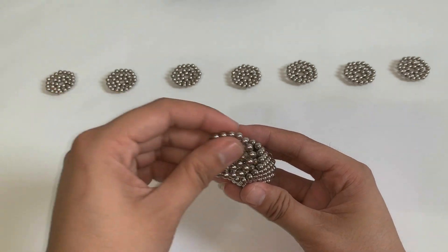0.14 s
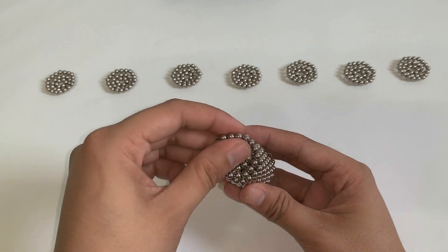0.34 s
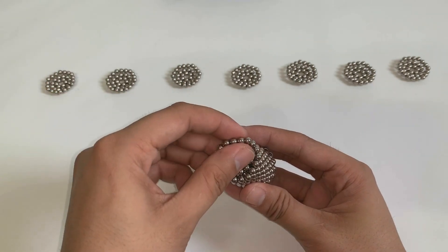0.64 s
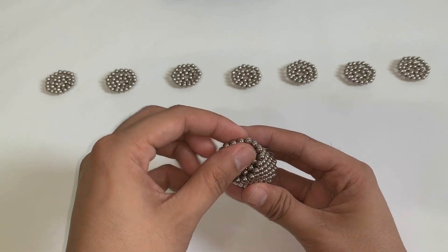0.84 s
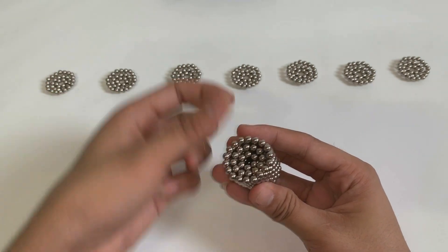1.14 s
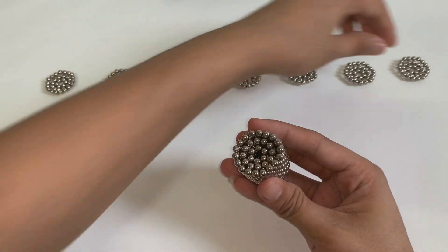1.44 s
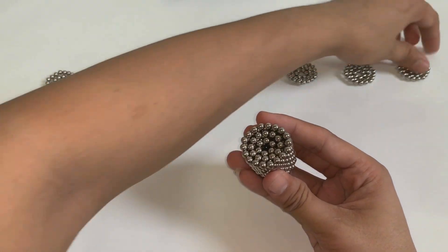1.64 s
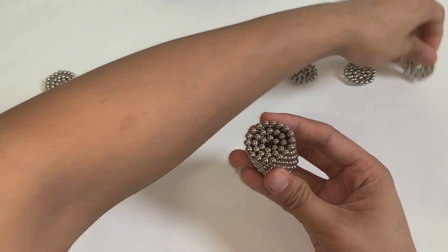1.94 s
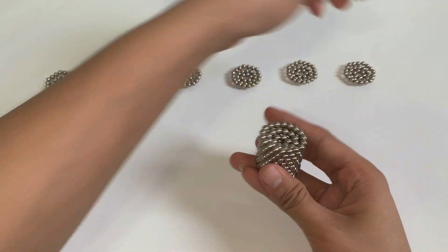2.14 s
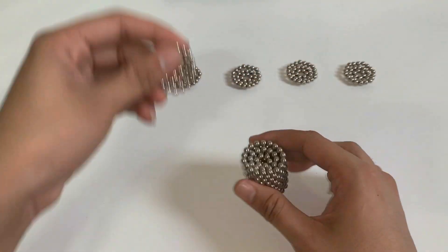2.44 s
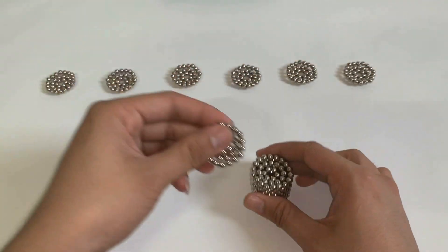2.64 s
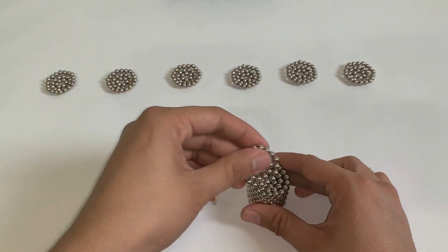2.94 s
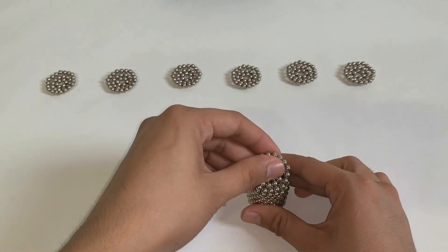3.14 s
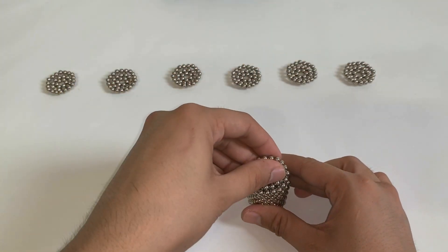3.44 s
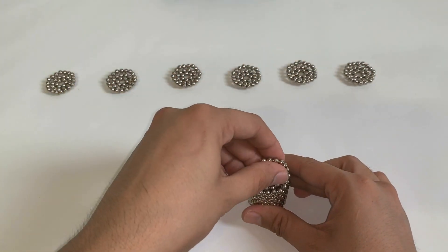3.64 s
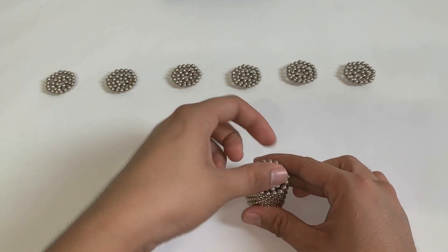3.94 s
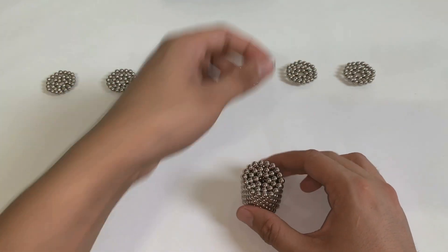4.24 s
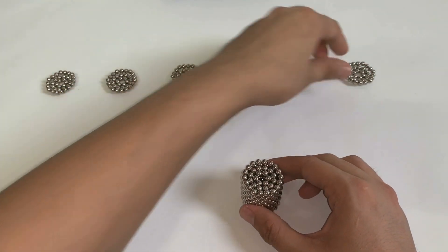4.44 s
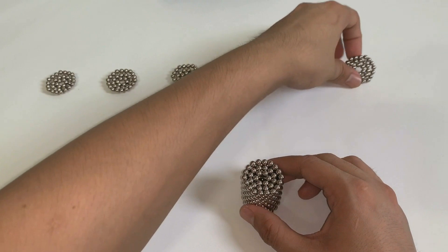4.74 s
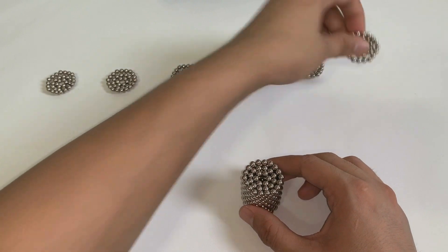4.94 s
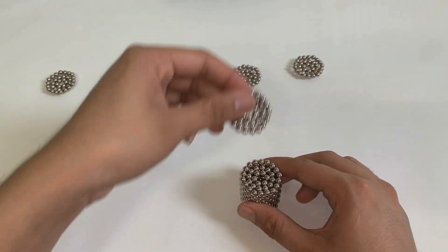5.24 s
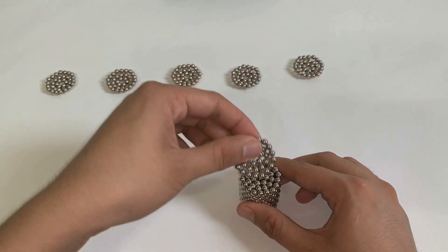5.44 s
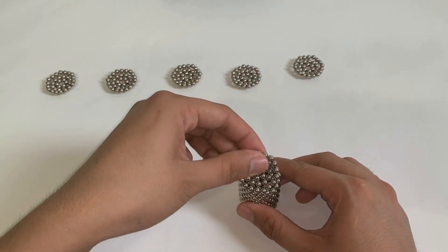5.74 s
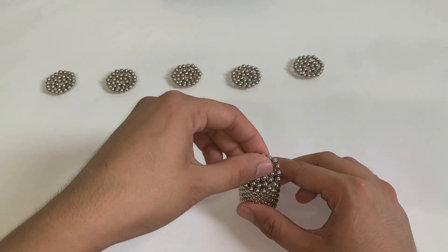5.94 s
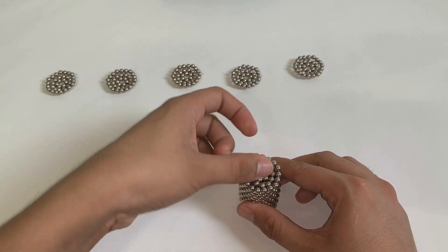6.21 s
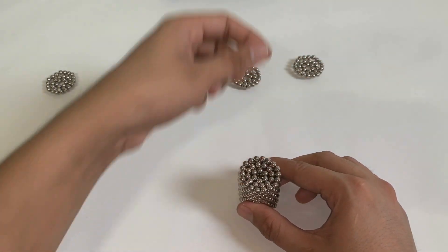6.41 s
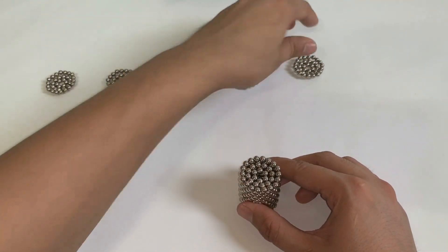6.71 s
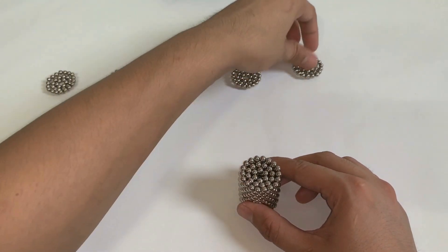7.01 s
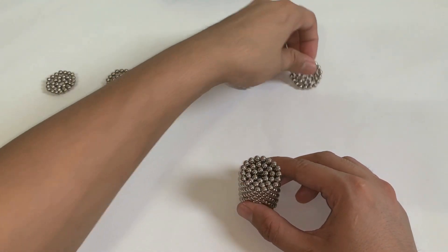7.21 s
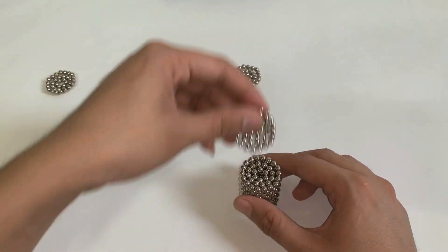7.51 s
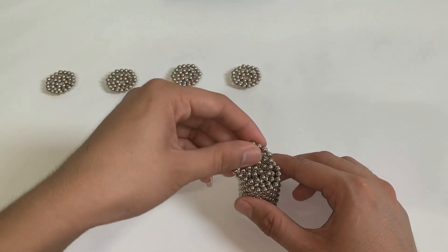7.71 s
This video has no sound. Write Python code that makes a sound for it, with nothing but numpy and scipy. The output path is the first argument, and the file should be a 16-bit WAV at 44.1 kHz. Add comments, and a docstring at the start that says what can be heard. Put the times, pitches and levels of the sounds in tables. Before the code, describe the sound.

Small magnetic metal balls click and snap together in short bursts, between soft bumps and brief scrapes on a table.

```python
"""Small magnetic steel balls click into place on a hand-held stack. A forearm bumps the table, a disc
of balls is dragged off it in stick-slip jerks, and the stack is set down with a knock. A faint,
breathy hiss follows, then the disc is pressed home in chains of snaps that drive the table's modes.
A second disc is dragged and snapped on, then a third is dragged, and a few last clicks follow.
Throughout, a small quiet room answers over a low rumble."""
import sys
import numpy as np
from scipy import signal
from scipy.fft import rfft, irfft, next_fast_len
from scipy.io import wavfile

SR = 44100
rng = np.random.default_rng(int(sys.argv[2]) if len(sys.argv) > 2 else 0)


def put_to_file(sound):
    """Save the sound as 16-bit audio at rate SR, in the file named by the first command-line argument."""
    columns = np.atleast_2d(sound).T  # one column per channel
    safe = np.clip(columns, -1, 1)
    whole_steps = np.round(safe * 32767)
    wavfile.write(sys.argv[1], SR, whole_steps.astype(np.int16))


N = 347067

# Balls jumping to their seats. Each row: start in seconds, relative level in dB, treble tilt.
SEATINGS = [(0.4777, -38, -7), (0.4808, -28.5, -6), (0.4832, -37, 0), (0.622, -46.5, -3), (0.6766, -36, 14),
            (0.69, -43.5, -6), (0.8637, -38, 24), (0.8748, -34.5, -4), (0.9086, -35.5, -8),
            (0.921, -54, -7), (0.9651, -45, -4), (0.9682, -42.5, -10), (0.987, -50, 1),
            (0.9891, -31.5, -11), (1.0018, -32, 4), (1.0045, -28, -15), (1.0072, -34, 2), (1.1054, -45, 19),
            (1.1089, -26, 8), (1.1155, -18, 21), (2.0497, -51.5, -20), (2.7518, -47, 7.5),
            (3.3974, -38.5, 6.5), (3.4009, -26, 11), (3.4127, -55, 8), (3.4649, -40, -3), (3.529, -45, 3),
            (3.5895, -43, 5), (3.6625, -47, 3), (3.72, -66, 0), (3.7519, -50.5, 3.5), (3.7581, -35.5, 0),
            (3.918, -41, -1), (3.9255, -39, -2.5), (3.9321, -42.5, 6), (3.9418, -47, 13),
            (3.965, -37.5, 18), (3.975, -39, 14), (3.9765, -45, 6), (3.9841, -25, 13), (3.9885, -19, 2),
            (3.9899, -21, 5), (3.9921, -17.5, -3), (4.191, -60, -14), (5.8101, -33, 6.5), (5.8121, -29, 15),
            (5.9177, -41, 4), (5.921, -51, 1), (6.0465, -43.5, 1), (6.0532, -36, 14), (6.1616, -38.5, -3),
            (6.1775, -38, 4), (6.1853, -34.5, -1), (6.19, -36.5, 18), (6.1935, -26, 4), (6.1957, -34, 10),
            (6.2382, -41, 1), (6.2596, -36, 16), (6.2615, -37.5, 2), (6.3186, -35, 6), (6.3242, -37, 4),
            (6.329, -27, 0), (6.3316, -26, 6), (6.3331, -31.5, 16), (6.342, -27.5, 15), (7.37, -62, -5),
            (7.7853, -37.5, 6.5), (7.7888, -34, -6)]
# Modes of the table top. Each row: frequency in Hz, relative level in dB, 60 dB decay time in seconds.
TABLE_MODES = [(103.6, -0.5, 0.8), (134.5, 7.5, 0.2), (219, 0, 0.17), (243.6, 9.5, 0.066),
               (311, -11.5, 0.15), (387, 0.5, 0.09), (494.5, 6, 0.08), (541, -3, 0.14), (594, -10, .08),
               (694, -2.5, 0.08), (826, -0.5, 0.12), (1041, -6, 0.1), (1280, -2, 0.063), (1421, 2, .04),
               (1726, -8, 0.073)]
# The frequencies in Hz at which the strength of a blow is given.
BLOW_BANDS_HZ = [120, 240, 480, 1100]


def snap(db, tilt, stack_db, neighbours=3, rattle_s=0.00039, contact_s=.00055, hand_s=0.0026):
    """Impact noise: a ball jumps to its seat and pulls its neighbours into hard, barely ringing contacts."""
    # Spectra of the steel tick and of the whole stack. Each row: frequency in Hz, relative level in dB.
    steel_spectrum = [(500, -40.5), (2200, -31.5), (3100, -19), (4400, -11.5), (5900, -8.5), (7700, -3.5),
                      (9300, 1), (11000, 3.5), (13000, 3.5), (15400, -4), (16500, -16.5)]
    stack_spectrum = [(150, -22), (500, -8.5), (1200, -7), (2600, -3.5), (4000, 5.5), (7000, -17.5)]
    t = np.arange(SR // 50) / SR
    starts = np.append(0, rng.uniform(0, rattle_s, neighbours))
    sizes = amp(np.append(0, rng.normal(-4, 3, neighbours)))
    age = t - starts[:, None]
    power = (sizes[:, None] ** 2 * (age >= 0) * np.exp(-2 * np.abs(age) / contact_s)).sum(0)
    scattered = amp(-13) * np.exp(-t / hand_s)  # by the cupped hands and the table
    envelope = np.hypot(np.sqrt(power), scattered)
    steel = struck(envelope * rng.standard_normal(len(t)), steel_spectrum, tilt)
    stack = struck(envelope * rng.standard_normal(len(t)), stack_spectrum)
    return amp(db) * (steel + amp(stack_db) * stack)


def pressed(s, loose, firm):
    """Linear interpolation between loose and firm contact, by the thumb's pressure at time s."""
    # Each row: time in seconds, pressure from 0 to 1.
    thumb_pressure = [(0.48, 0.53), (0.68, 0.2), (0.87, 0.3), (0.97, 0.2), (1.11, 0.25), (3.40, 0.47),
                      (3.53, 0), (3.59, 0.98), (3.66, 0.45), (3.92, 0.94), (3.99, 0.72), (5.81, 0.51),
                      (6.16, 0.58), (6.195, 0.94), (6.25, 1), (6.32, 0.83), (6.345, 0.67), (7.79, 0.62)]
    return loose + (firm - loose) * np.interp(s, *np.transpose(thumb_pressure))


def snaps():
    """Mechanical coupling: the firmer the thumb presses, the more of the stack sounds in each click."""
    track = np.zeros(N)
    for s, db, tilt in SEATINGS:
        add(track, s, snap(db, tilt, stack_db=pressed(s, -40, -9)))
    return track


def stack_ring(lock_s=3.992, ring_db=-33, t60_s=0.046):
    """Free decay: the hardest snap locks a whole layer and leaves the stack ringing briefly."""
    track, t = np.zeros(N), np.arange(SR // 5) / SR
    ring = narrow(rng.standard_normal(len(t)), centre_hz=5550, half_width_hz=430)
    add(track, lock_s, amp(ring_db - 60 * t / t60_s) * ring)
    return track


def blow(push_db, rise_s=0.00056, ring_db=-2, thud_s=0.0016, clack_s=0.0014, firm=0.44):
    """Modal excitation: a blow thuds and rings the table; a harder one starts faster and clacks more."""
    # Each row: frequency in Hz, relative level in dB.
    clack_spectrum = [(300, -10.5), (900, 4), (1800, -0.5), (3800, -2), (6000, -18), (12000, -30.5)]
    t = np.arange(SR // 2) / SR
    hz, mode_db, t60 = np.transpose(TABLE_MODES)[:, :, None]
    burst = lambda life_s: rng.standard_normal(len(t)) * np.exp(-t / life_s)
    hardness = amp(.5 * (push_db[-1] - max(push_db)))  # a finger pad hardly clacks
    force_db = along(list(zip(BLOW_BANDS_HZ, push_db)), hz) + rng.normal(0, 1.55, hz.shape)
    modes = amp(ring_db + mode_db + force_db - 60 * t / t60) * np.sin(2 * np.pi * hz * t)
    sound = modes.sum(0) * (1 - np.exp(-t * hardness / rise_s))
    density_db = push_db - 10 * np.log10(BLOW_BANDS_HZ)
    thud_spectrum = [(50, density_db[0] - 26), *zip(BLOW_BANDS_HZ, density_db),
                     (4000, density_db[-1] - 35)]
    thud = struck(burst(thud_s) * t, thud_spectrum)  # swells, then dies
    thud *= signal.windows.tukey(len(thud), .1)
    add(sound, 0, amp(max(push_db) + 10) * min(1, hardness / firm) * thud)
    add(sound, 0, amp(push_db[-1] + 10) * hardness * struck(burst(clack_s), clack_spectrum))
    return sound


def knocks(below_db_per_oct=8.5, above_db_per_oct=11):
    """Impact: discs, stack and fingers strike the table with a peaked force spectrum; steel also ticks."""
    # Each row: start in seconds, relative level in dB, strongest frequency in Hz, tick level in dB.
    impacts = [(1.71, -49, 480, -71), (1.7345, -41.5, 1670, -65), (1.79, -54, 1290, -60),
               (1.803, -52.5, 1105, -74), (1.99, -58.5, 340, -70), (2.749, -45, 1107, -54),
               (2.7508, -28.5, 386, -52), (3.403, -56, 260, -87), (3.589, -57.5, 267, -90),
               (3.995, -42.5, 195, -70.5), (4.103, -47, 134, -100), (4.576, -46, 325, -65),
               (4.593, -53.5, 755, -76.5), (4.669, -70, 850, -75.5), (4.822, -46.5, 980, -54.5),
               (4.8771, -45, 1206, -64), (6.196, -62, 500, -81), (6.343, -47.5, 650, -73),
               (6.879, -48, 320, -79.5), (7.219, -58, 1200, -79), (7.789, -49.5, 109.6, -93)]
    track = np.zeros(N)
    for s, db, hz, tick_db in impacts:
        octaves = np.log2(np.array(BLOW_BANDS_HZ) / hz)
        fall_db = np.maximum(above_db_per_oct * octaves, -below_db_per_oct * octaves)
        add(track, s, blow(db - fall_db))
        add(track, s, snap(tick_db, tilt=-8, stack_db=1))
    return track


def recoil(set_down_s=2.749, delay_s=0.0017):
    """Reaction force: once the stack stands, each click pushes the table, harder under the thumb."""
    track, octaves = np.zeros(N), np.log2(np.array(BLOW_BANDS_HZ) / BLOW_BANDS_HZ[0])
    for s, db, _ in SEATINGS:
        if s > set_down_s:
            level_db = -47 + 0.55 * db + pressed(s, 0, 3.5)
            fall_db_per_oct = pressed(s, 9, 1)
            add(track, s + delay_s, blow(level_db - octaves * fall_db_per_oct))
    return track


def bumps():
    """Soft impact: forearm and hand give the table a low push that swells and soon dies away."""
    # Each row: start in seconds, envelope peak in dB, frequency in Hz, cycles up to the peak.
    pushes = [(1.509, -50.5, 55.2, 0.57), (1.551, -42.5, 62, 0.44), (1.639, -43.5, 90.5, .5),
              (1.708, -36.5, 51.4, 0.38), (2.087, -50.5, 51.6, 0.78), (2.283, -39, 128.7, 0.54),
              (2.7508, -29.5, 245, 1.5), (4.101, -44.5, 248, 1.42), (4.136, -49.5, 107.5, 2.9),
              (4.165, -58, 263.6, 5.8), (4.194, -39.5, 128.8, 2.37), (4.25, -48, 118, 2.1),
              (4.738, -44.5, 47, 0.51), (6.179, -47.5, 129, 2.5), (6.909, -49.5, 48, 0.88)]
    track, t = np.zeros(N), np.arange(SR // 5) / SR
    for s, db, hz, cycles in pushes:
        age = t * hz / cycles  # 1 at the peak
        envelope = age ** 2 * np.exp(2 * (1 - age))
        add(track, s, amp(db) * envelope * np.sin(2 * np.pi * hz * t))
    return track


def table_response(f, resonance_db=4):
    """Modal superposition: the table's response is a direct path plus one resonance for each mode."""
    modes = sum(1 / (1 + 1j * (f - hz) * t60 * 2 * np.pi / np.log(1000)) for hz, _, t60 in TABLE_MODES)
    return 1 + amp(resonance_db) * modes


def drags(slips_per_s=800, scatter_db=2.5, chatter_db=5, half_width_hz=70):
    """Stick-slip friction: a dragged disc's jerks tick and stir the table; each pull has its own pitch."""
    # One list for each disc. Each row: start and length in seconds, relative rumble level and its
    # change over the pull in dB, relative grit level in dB, chatter frequency in Hz.
    pulls = [
        [(1.71, 0.0035, -55.5, 5, -70, 1390), (1.74, 0.1, -54, -8.5, -70, 2330),
         (1.788, 0.012, -46, -5, -57, 1250), (1.82, 0.058, -50, -3.5, -67.5, 454),
         (1.865, 0.061, -49, -2, -68, 1240), (1.93, 0.075, -54, 2, -67.5, 1060),
         (1.987, 0.0057, -50, 3.5, -74, 1050)],
        [(4.595, 0.089, -48.5, -9.5, -72.5, 622), (4.668, 0.016, -44, -1.5, -72, 830),
         (4.71, 0.11, -72, 11, -89.5, 440), (4.83, .035, -51, -4.5, -62.5, 700)],
        [(6.874, 0.025, -67.5, -18.5, -81, 447), (6.985, 0.052, -58.5, 6, -72.5, 520),
         (7.103, 0.022, -41, -5, -53.5, 530), (7.145, 0.051, -50, 0, -62, 820),
         (7.218, 0.041, -45.5, -8, -68.5, 725), (7.268, 0.021, -50, -7, -57.5, 867)],
    ]
    # Spectra of each disc's rumble and of the grit. Each row: frequency in Hz, relative level in dB.
    rumble_spectra = [
        [(110, -6.5), (200, -14.5), (380, -1), (750, -10.5), (1200, -5), (1800, -12.5), (3000, -19.5),
         (4500, -67)],
        [(120, -64.5), (250, -10), (600, -15), (860, -6.5), (1150, -18.5), (1750, -24.5), (3500, -43.5)],
        [(120, -27.5), (250, -5.5), (450, -4.5), (830, -6.5), (1100, -10.5), (3000, -34), (4500, -52.5)],
    ]
    grit_spectrum = [(1200, -1), (2500, 10), (4500, 9.5), (6500, -2), (10000, -9), (15000, -21)]
    track, t = np.zeros(N), np.arange(-SR // 25, SR // 4) / SR
    for disc_pulls, spectrum in zip(pulls, rumble_spectra):
        for s, length_s, rumble_db, change_db, grit_db, hz in disc_pulls:
            slips = (rng.random(len(t)) < slips_per_s / SR) * amp(rng.normal(0, scatter_db, len(t)))
            friction = unit(slips * rng.choice([-1, 1], len(t))) + 0.49 * rng.standard_normal(len(t))
            chatter = lambda f: 1 + amp(chatter_db) / (1 + 1j * (f - hz) / half_width_hz)
            rumble = coloured(filtered(friction, lambda f: table_response(f) * chatter(f)), spectrum)
            grit = coloured(friction, grit_spectrum)
            for db, drift_db, sound in ((rumble_db - 1, change_db, rumble), (grit_db - 4, 0, grit)):
                gain = stroke(t, length_s, drift_db)
                add(track, s + t[0], amp(db) * np.sqrt(np.mean(gain ** 2)) * unit(gain * sound))
    return track


def squeals_and_hiss():
    """Narrow-band noise: steel sings thinly on the table; later comes a faint, breathy two-band hiss."""
    # Each row: start and length in seconds, level and its change in dB, centre and half-width in Hz.
    noise_bands = [(1.891, 0.074, -74, 3, 4440, 260), (1.972, 0.064, -67.5, -11, 4570, 220),
                   (2.877, 0.281, -88, -1.5, 2390, 416), (2.888, .24, -95, -5, 4536, 590)]
    track, t = np.zeros(N), np.arange(-SR // 20, SR // 2) / SR
    for s, length_s, db, change_db, hz, half_width_hz in noise_bands:
        band = narrow(rng.standard_normal(len(t)), hz, half_width_hz)
        add(track, s + t[0], amp(db) * stroke(t, length_s, change_db) * band)
    return track


def nearby(count=8, latest_s=.011, echo_db=-24):
    """Comb filtering: table, hands and microphone housing throw back a few weak early copies."""
    delay = rng.uniform(0.00092, latest_s, (2, count, 1))
    gain = amp(echo_db) * rng.choice([-1, 1], delay.shape)
    return (gain * np.sinc(np.arange(SR // 40) - delay * SR)).sum(1)


def walls(build_s=0.0006):
    """Reverberation: the walls answer with a short tail that dies sooner in the treble."""
    # Each row: frequency in Hz, 60 dB decay time in seconds.
    decay_times = [(100, 0.42), (400, 0.25), (1500, 0.23), (6000, 0.19), (15000, 0.16)]
    # Each row: frequency in Hz, relative level of the tail in dB.
    tail_spectrum = [(100, -15), (400, -3.5), (1500, -6.5), (3600, -14.5), (6000, -11.5), (12000, -11)]
    hz, t, noise = signal.stft(rng.standard_normal((2, SR // 3)), SR, nperseg=256)
    t60 = along(decay_times, hz)[:, None]
    decay = amp(along(tail_spectrum, hz)[:, None] - 60 * t / t60)
    energy_scale = np.sqrt(2 * np.log(1000) / (t60 * SR))
    tail = signal.istft(noise * decay * energy_scale, SR, nperseg=256)[1]
    return tail * (1 - np.exp(-np.arange(tail.shape[1]) / SR / build_s))


def room(x):
    """Convolution with echoes that are redrawn four times a second, so the tails vary in colour."""
    wet, step = np.zeros((2, N)), SR // 4
    for start in range(0, N, step):
        for paths in (nearby(), walls()):
            for track, path in zip(wet, paths):
                add(track, start / SR, signal.fftconvolve(x[start:start + step], path))
    return diffuse(wet)


def background(hiss_db=-82.5):
    """Noise floor: diffuse room rumble swells while the arms work, under each microphone's own hiss."""
    # Each row: time in seconds, relative rumble level in dB.
    swells = [(0.0, -70), (1.532, -68), (1.691, -61.5), (2.67, -77.5), (2.85, -64.5), (4.25, -67),
              (5.24, -69.5), (6.36, -66.5), (7.87, -71.5)]
    # Each row of both spectra: frequency in Hz, relative level in dB.
    rumble_spectrum = [(12, -47), (20, -23), (43, 5), (86, -2), (125, -3), (179, -14), (232, -7),
                       (401, -16.5), (437, -17.5), (584, -28), (1200, -42.5), (1560, -78), (2640, -120)]
    hiss_spectrum = [(300, -1), (1000, 2), (2500, -4.5), (4600, -2), (6000, -3.5), (8500, -6.5),
                     (12000, -10.5), (15200, -3.5), (15900, -24.5)]
    gain = amp(1 + np.interp(np.arange(N) / SR, *np.transpose(swells)))
    rumble = gain * coloured(rng.standard_normal((2, N)), rumble_spectrum)
    return diffuse(rumble) + amp(hiss_db) * coloured(rng.standard_normal((2, N)), hiss_spectrum)


def diffuse(pair):
    """Diffuse field: two unrelated signals, as mid and side, give partly coherent left and right."""
    # Each row: frequency in Hz, side against mid in dB.
    width = [(100, -14.5), (300, -9), (1000, -1), (2400, 4), (6500, 7.5), (10000, -17.5)]
    side = filtered(pair[1], lambda hz: amp(along(width, hz)))
    return np.array([pair[0] + side, pair[0] - side])


def stroke(t, length_s, change_db, attack_s=0.0054, release_s=0.0083):
    """Exponential envelope: a sound sets in, drifts in level from t = 0, and stops."""
    outside = np.maximum(-t, 0) / attack_s + np.maximum(t - length_s, 0) / release_s
    return np.exp(-outside) * amp(change_db * np.clip(t / length_s, 0, 1))


def struck(x, spectrum, tilt=0, size=2048):
    """Minimum-phase filtering of a burst, scaled to the energy of one millisecond at rms 1."""
    hz = np.fft.rfftfreq(size, 1 / SR)
    db = along(spectrum, hz) + tilt * along([(9000, 0.00089), (14000, 0.3)], hz)
    cepstrum = irfft(np.log(amp(db)))
    cepstrum[1:size // 2] *= 2  # folding the cepstrum makes the filter causal
    cepstrum[size // 2 + 1:] = 0
    burst = irfft(rfft(x, size) * np.exp(rfft(cepstrum)))
    return burst / np.linalg.norm(burst) * np.sqrt(SR / 1000)


def narrow(x, centre_hz, half_width_hz):
    """x through one narrow resonance, at rms 1."""
    return unit(filtered(x, lambda hz: 1 / (1 + ((hz - centre_hz) / half_width_hz) ** 2)))


def coloured(x, spectrum):
    """Spectral shaping of x, at rms 1."""
    return unit(filtered(x, lambda hz: amp(along(spectrum, hz))))


def filtered(x, response):
    """Linear filtering: the spectrum of x times a complex response."""
    size = next_fast_len(x.shape[-1] + 8192)
    return irfft(rfft(x, size) * response(np.fft.rfftfreq(size, 1 / SR)), size)[..., :x.shape[-1]]


def along(points, hz):
    """Interpolation of (Hz, value) points on a log axis."""
    f, values = np.transpose(points)
    return np.interp(np.log(hz + 1), np.log(f + 1), values)


def amp(db):
    """Decibels to gain."""
    return 10 ** (np.asarray(db) / 20)


def unit(x):
    """x at rms 1."""
    return x / np.sqrt(np.mean(x ** 2) + 1e-20)


def add(track, s, sound):
    """Superpose a sound on the track at time s."""
    part = track[max(0, round(s * SR)):][:len(sound)]
    part += sound[:len(part)]


def scene(table_pan_db=0.7):
    """Superposition: direct sound of balls and table, their reflections and the noise floor."""
    balls = snaps() + stack_ring()
    table = knocks() + recoil() + drags() + squeals_and_hiss()
    direct = balls + table * amp([[table_pan_db], [-table_pan_db]]) + bumps()
    return direct + room(balls + table) + background()


def record(dry, lag_s=.00022, top_hz=16450):
    """Interchannel delay: the left treble lags the right by about 0.2 ms; a low-pass limits the band."""
    lag_share = [(200, .15), (2400, .25), (6200, 1)]  # Each row: frequency in Hz, share of the lag.
    delay = lambda hz: np.exp(1j * np.pi * hz * lag_s * along(lag_share, hz) * np.array([[-1], [1]]))
    return filtered(dry, lambda hz: delay(hz) / (1 + (hz / top_hz) ** 120))


dry = scene()
out = record(dry)
put_to_file(out)
```